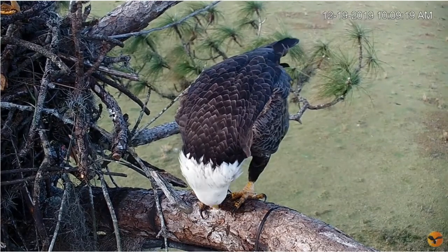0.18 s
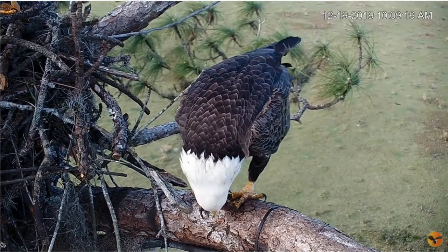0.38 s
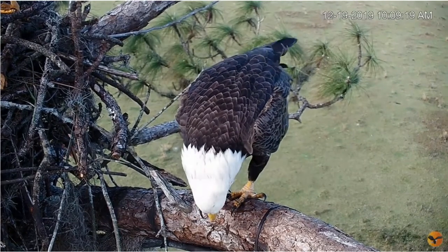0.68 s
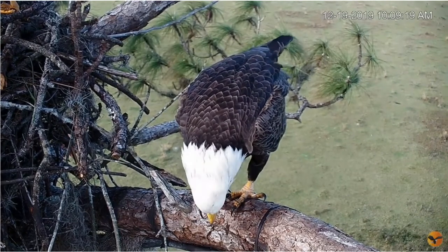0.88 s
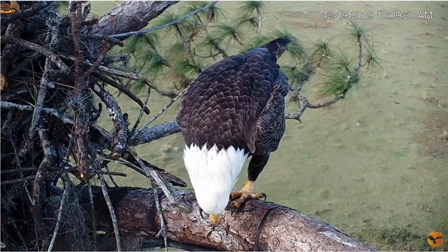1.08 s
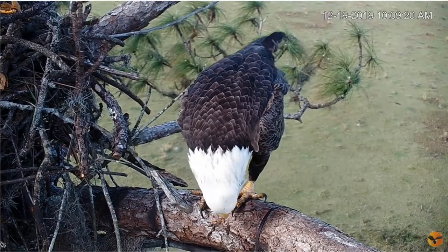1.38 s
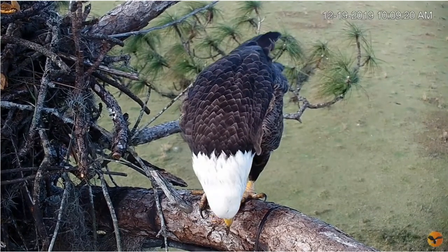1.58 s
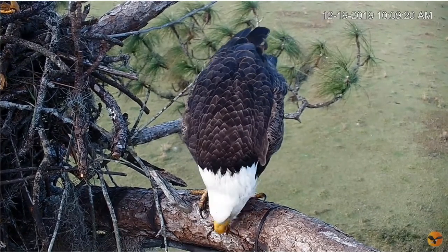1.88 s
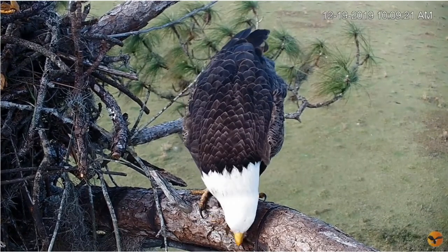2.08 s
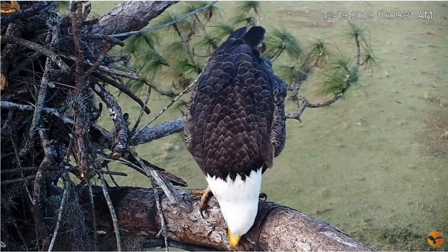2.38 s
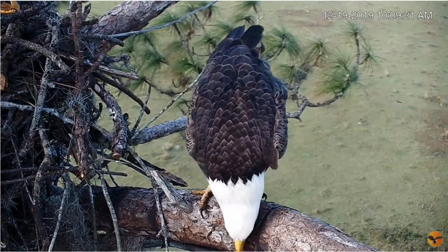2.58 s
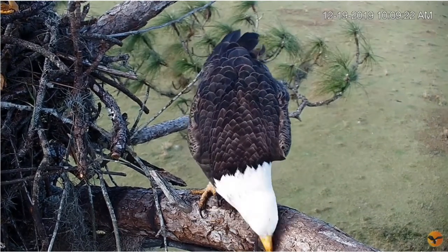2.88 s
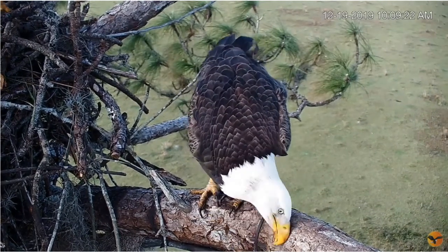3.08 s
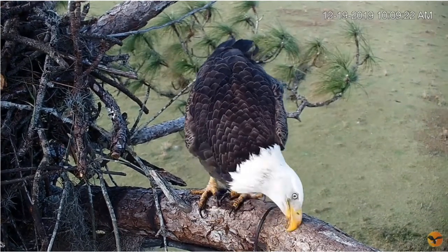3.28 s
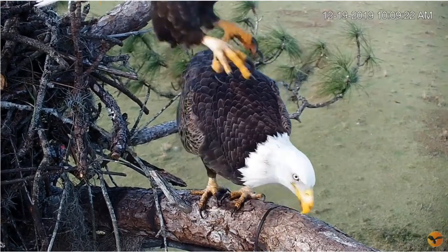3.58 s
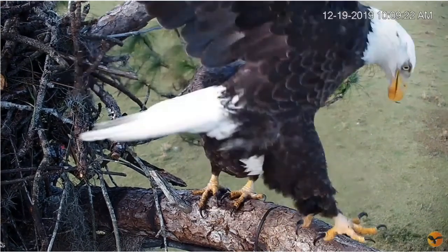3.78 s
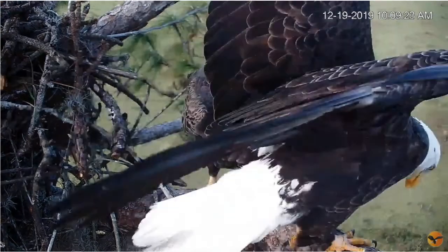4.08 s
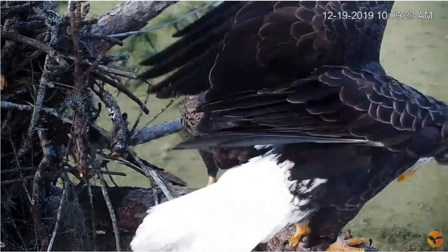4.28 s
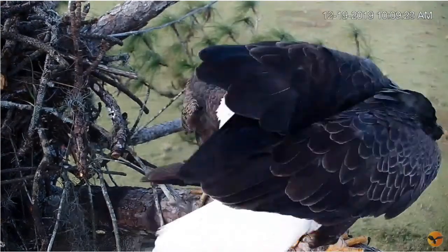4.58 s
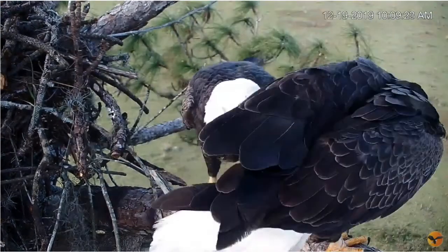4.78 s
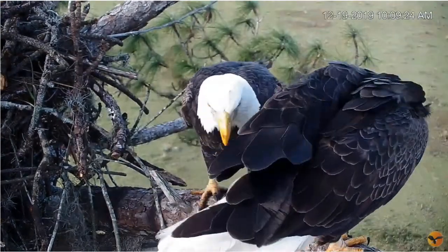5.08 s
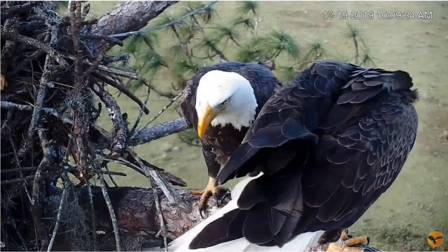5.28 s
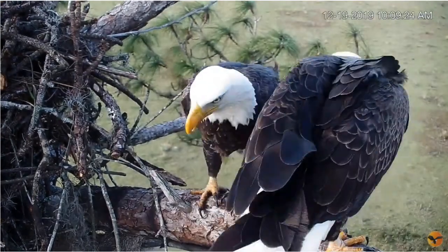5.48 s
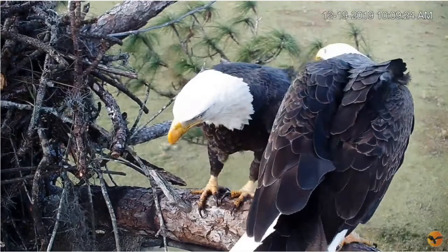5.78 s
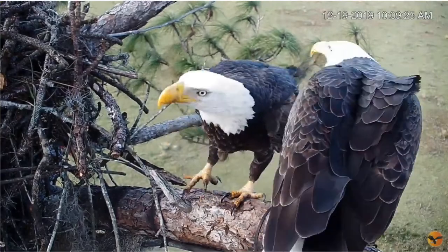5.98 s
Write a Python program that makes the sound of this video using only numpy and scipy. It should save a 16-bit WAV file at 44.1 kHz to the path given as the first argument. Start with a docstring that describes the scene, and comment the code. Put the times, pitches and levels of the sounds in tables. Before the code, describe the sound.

Over a low outdoor rumble and the roar of distant traffic, a brief soft scrape on bark leads into high, quavering eagle cries and short, sharp whistles. The birds are close, and the loudest cry, about halfway through, overloads the microphone a little. Faint talon ticks and quick, quieter chittering notes follow, then a final thin cry. A short reverberation surrounds the calls.

```python
"""Two bald eagles greet each other on a branch beside their nest, close to a small outdoor microphone.
A foot scrapes on bark over a low rumble and the roar of far-off traffic. From about one second the syrinx
gives thin wavering peals and piercing chirps, the loudest overloading the microphone; talons tick.
Near five seconds the calls give way to low chittering as the mate lands, with one last peal near the end.
A short reverberation spreads it all into stereo."""
import sys
import numpy as np
from scipy import signal
from scipy.fft import rfft, irfft
from scipy.io import wavfile

SR = 44100
rng = np.random.default_rng(int(sys.argv[2]) if len(sys.argv) > 2 else 0)


def log_audio(samples):
    """Write samples as a 16-bit WAV file to the path given in sys.argv[1]."""
    # one column per channel
    frames = np.atleast_2d(samples).T
    # limit to full scale, then quantise
    limited = np.clip(frames, -1, 1)
    pcm = np.round(limited * 32767).astype(np.int16)
    wavfile.write(sys.argv[1], SR, pcm)


N = 272097

# colour of the hiss in the open beak: frequency_hz, level_db
BEAK_HISS = [(1500, -31.5), (2700, 4), (3900, -1), (5200, -17), (7500, -8.5), (11000, -39)]


def peals(settle_s=.013, lead_s=.002, dip_sharpness=5.1, wobble_db=.33, rasp_hz=2896):
    """Held tones at close range: each starts hoarse and wavers through two crests, louder where higher."""
    # one peal a row: start_s, length_s, attack_s, release_s, pitch_hz, climb_hz_per_s, waver_hz,
    # waver_share, level_db, dip_db, swell_db_per_s, second_harmonic_db, rasp_db
    calls = [ (0.896, 0.16, 0.037, 0.023, 3630, -100, 10.2, 0.0185, -16.5, 11, -53, -25, -17.5),
             (2.323, 0.1544, 0.013, 0.017, 3652, 400, 11.9, 0.016, -19.5, 5.5, 18, -24.5, -28.5),
             (3.058, .164, 0.019, .013, 2800, 326.5, 10.9, .026, -7, 2, 8.5, -29, -42.5),
             (5.872, 0.1677, 0.015, 0.017, 3484, -120, 10.4, 0.0292, -14.7, 15.5, -40.5, -29, -32)]
    out = np.zeros(N)
    for (start, length, attack, release, hz, climb, waver_hz,
         depth, db, dip_db, swell, second_db, rasp_db) in calls:
        t = np.arange(0, length, 1 / SR)
        n = len(t)
        hoarse = np.exp(-t / settle_s)
        pitch = hz * (1 - depth * np.cos(2 * np.pi * waver_hz * t)) + climb * (t - length / 2)
        # loudness crests just before pitch does
        trough = abs(np.cos(np.pi * waver_hz * (t + lead_s))) ** dip_sharpness
        level = amp(db + swell * t - dip_db * trough + wobble_db * tremor(n, hz=55))
        tone = syrinx(pitch, [0, second_db, -60], .0016 + .0043 * hoarse, shimmer=.011, flutter_hz=295.6)
        hiss = (amp(-47.5) + amp(-25) * hoarse) * noise(n, lambda f: read(BEAK_HISS, f))
        rasp = amp(rasp_db) * breath_rasp(n, rasp_hz)
        add(out, start, gate(t, attack, release) * level * (tone + hiss + rasp))
    return out


def chirps(swell_db=3.5, hiss_db=-33):
    """Short piercing whistles near the microphone, each one quick slide of the syrinx."""
    # one chirp a row: start_s, length_s, pitch_hz, rise_hz, level_db
    notes = [ (0.924, 0.011, 2813, 53, -19.5), (1.525, 0.064, 2730, 281, -23.5),
             (1.568, 0.052, 2890, -83, -29.5), (1.599, 0.052, 2818, 179, -7.5),
             (2.328, 0.021, 2853, 44.5, -25.5), (3.557, 0.034, 2890, 156.5, -24),
             (3.577, 0.026, 2941, 18, -8.5), (3.685, 0.017, 2693, -180, -12.5),
             (3.698, 0.018, 2822, 28, -8.5), (4.227, 0.017, 2870, 77, -33), (5.356, .019, 3364, 6, -35)]
    out = np.zeros(N)
    for start, length, hz, rise_hz, db in notes:
        t = np.arange(0, length, 1 / SR)
        pitch = glide(len(t), hz, rise_hz, droop=.0064)
        tone = syrinx(pitch, [0, -36, -54], jitter=.0042, shimmer=.035, flutter_hz=304)
        hiss = amp(hiss_db) * noise(len(t), lambda f: read(BEAK_HISS, f))
        level = amp(db + swell_db * (t / length - .5))
        add(out, start, gate(t, .37 * length, .61 * length) * level * (tone + hiss))
    return out


def chitter(rasp_db=-20):
    """Quick, low, reedy notes, each a small arch of pitch through the throat."""
    # one note a row: start_s, length_s, pitch_hz, rise_hz, level_db
    notes = [ (4.695, .017, 1735, -150, -35), (4.707, 0.03, 1282, -134, -33.5),
             (5.115, 0.034, 1926, -16, -27.5), (5.132, 0.022, 1967, -3, -26), (5.149, .02, 1930, -99, -28),
             (5.237, 0.017, 1880, -73.5, -30.5), (5.252, .016, 1888, -124, -30.5),
             (5.686, 0.031, 1285, 92, -35.5), (5.783, 0.0078, 1260, -320, -38.5),
             (5.799, .017, 1913, -124, -30), (5.815, .017, 1968, -34.5, -28.5), (6, .017, 1905, -87.5, -31),
             (6.01, 0.031, 1370, -240, -39), (6.122, 0.012, 1203, -330, -37)]
    # colour of the throat: frequency_hz, gain_db
    throat = [(1200, 14), (1900, 7), (2600, 9.5), (3400, 6), (3900, 6.5), (5000, -18), (5800, -15.5),
              (7700, -27), (10000, -54)]
    out = np.zeros(N)
    for start, length, hz, rise_hz, db in notes:
        n = round(length * SR)
        pitch = glide(n, hz, rise_hz, droop=.043)
        harmonic_db = [read(throat, k * pitch) for k in range(1, 6)]
        tone = syrinx(pitch, harmonic_db, jitter=.013, shimmer=.02, flutter_hz=530)
        rasp = noise(n, lambda f: read(throat, f) - 12 * abs(np.log2((f + 1) / 3200)))
        envelope = gate(np.arange(n) / SR, .24 * length, .34 * length)
        add(out, start, amp(db) * envelope * (tone + amp(rasp_db) * rasp))
    return out


def cracks():
    """The voice cracks: the syrinx slips for a moment to another, unsteady pitch."""
    # one rough squeak a row: start_s, length_s, pitch_hz, level_db
    squeaks = [(0.967, 0.041, 2950, -38), (1.007, 0.027, 2900, -38), (1.576, 0.042, 4050, -42.5),
               (1.706, 0.02, 4090, -47), (2.298, 0.013, 2114, -44.5), (3.056, 0.011, 3490, -38),
               (3.157, 0.012, 3107, -29.5), (3.552, 0.032, 3690, -45), (3.68, .011, 3500, -41),
               (4.209, 0.029, 3450, -48)]
    out = np.zeros(N)
    for start, length, hz, db in squeaks:
        n = round(length * SR)
        tone = syrinx(np.full(n, hz), [0, -32], jitter=.021, shimmer=.27, flutter_hz=450)
        add(out, start, amp(db) * tone * signal.windows.hann(n))
    return out


def syrinx(pitch, harmonic_db, jitter, shimmer, flutter_hz):
    """A vibrating membrane, unsteady in pitch (jitter) and in level (shimmer), both as shares."""
    n = len(pitch)
    phase = 2 * np.pi * np.cumsum(pitch * (1 + jitter * tremor(n, flutter_hz))) / SR
    tone = sum(amp(db) * np.cos(k * phase) for k, db in enumerate(harmonic_db, 1))
    return unit(tone) * (1 + shimmer * tremor(n, flutter_hz))


def breath_rasp(n, hz, width_hz=180):
    """Breath noise ringing in a narrow microphone-housing resonance near 2.9 kHz."""
    return noise(n, lambda f: -20 * np.log10(1 + ((f - hz) / width_hz) ** 2))


def talons(decay_s=.002, grain_db=4):
    """Dry ticks and one grainy scrape on the bark of the branch."""
    # talons and beak ticking on bark: start_s, level_db, tilt_db_per_octave
    ticks = [(1.072, -50, 16), (3.521, -45, 25), (3.525, -49, 14), (4.283, -48, 26), (4.287, -44, 22),
             (4.412, -57, -2), (4.774, -43.5, 9)]
    # a foot scraping over bark: time_s, level_db
    scrape = [(.15, -63), (.18, -49), (.21, -47), (.27, -55.5), (.305, -43), (.34, -63), (.45, -76)]
    # colour of bark under a talon: frequency_hz, level_db
    bark = [(1000, -29), (2400, 2.5), (2850, 13), (3300, 7), (4200, 6), (5200, -21.5), (7500, -14.5),
            (13000, -47)]
    out, t = np.zeros(N), np.arange(1024) / SR
    for start, db, tilt in ticks:
        burst = noise(len(t), lambda f: read(bark, f) + tilt * np.log2(np.maximum(f, 2000)))
        add(out, start, amp(db) * burst * np.exp(-t / decay_s))
    scrape_db = np.interp(np.arange(N) / SR, *np.transpose(scrape), left=-120, right=-120)
    friction = noise(N, lambda f: read(bark, f))
    grain = unit(amp(grain_db * tremor(N, hz=120)))
    return out + amp(scrape_db) * friction * grain


def outdoors(waver_db=.62):
    """The background at the nest: a low rumble and the roar of distant traffic and air."""
    # colours of the rumble and the roar: frequency_hz, level_db
    rumble_colour = [(15, -38), (26, -1), (43, 3.5), (61, 1.5), (84, -5), (199, -27.5), (300, -38.5),
                     (390, -69), (660, -120)]
    roar_colour = [(150, -45.5), (250, -20), (575, -14), (636, -12), (693, -10), (957, -2), (1300, -16),
                   (1620, -21.5), (2520, -26.5), (2890, -22), (3140, -23.5), (3990, -26.5), (5410, -44),
                   (13300, -53), (14500, -64.5)]
    # narrow humps in the roar: centre_hz, width_hz, gain_db
    humps = [(910, 110, 1.5), (2872, 160, 6)]
    # rise and fall of the rumble and the roar: time_s, level_db
    rumble_level = [(0, -32.5), (.85, -33.5), (1.25, -29.5), (1.75, -30.5), (2.4, -39), (2.9, -39.5),
                    (3.15, -37), (3.75, -32), (3.93, -39), (4.14, -33), (5.5, -34.5), (6.17, -28.5)]
    roar_level = [(0, -42), (1.65, -41), (2.9, -44.5), (3.9, -43.5), (4.25, -41.5), (5.5, -42.5),
                  (6.17, -40)]
    t = np.arange(N) / SR
    rumble = noise(N, lambda f: read(rumble_colour, f) - 24 * np.log2(np.maximum(f / 300, 1)))
    roar = noise(N, lambda f: read(roar_colour, f)
                 + sum(db / (1 + (2 * (f - hz) / width) ** 2) for hz, width, db in humps))
    rumble_db = np.interp(t, *np.transpose(rumble_level))
    roar_db = np.interp(t, *np.transpose(roar_level)) + waver_db * tremor(N, hz=10)
    return rumble * amp(rumble_db) + roar * amp(roar_db)


def overload(x, ceiling=.365, bias=.055, crossover_hz=1400):
    """The loudest calls hit the microphone's ceiling, one side sooner; low sounds pass untouched."""
    # colour of the distortion: frequency_hz, gain_db
    buzz = [(900, -33), (1700, -6), (2500, 2), (3200, 0.5), (5600, -10.5), (8500, 1.5), (11300, 1.5),
            (14000, -1)]
    hz = np.fft.rfftfreq(N, 1 / SR)
    highpass = 1 - 1 / (1 + (hz / crossover_hz) ** 6)
    oversampled = signal.resample_poly(irfft(rfft(x) * highpass, N), 4, 1)
    clipped = np.clip(oversampled, bias - ceiling, bias + ceiling)
    distortion = signal.resample_poly(clipped - oversampled, 1, 4)
    return x + irfft(rfft(distortion) * amp(read(buzz, hz)), N)


def reverberation(x, wet_db=-18, treble_loss_db_per_s=115):
    """Dense scattered echoes, unrelated in the middle and at the sides; the treble dies first."""
    # relative strength of the echoes: delay_s, level_db
    decay = [(.008, -23.5), (.017, -0.5), (.026, 4), (.042, -2.5), (.056, -6.5), (.078, 0), (.12, -14.5),
             (.2, -29), (.4, -50)]
    # colour of the echoes: frequency_hz, gain_db
    echo_colour = [(80, -40.5), (160, -23.5), (300, -7.5), (600, 0.5), (1200, -0.5), (3000, -1.5),
                   (8500, 5), (13000, -12)]
    t, padded = np.arange(SR // 2) / SR, N + SR
    envelope = amp(np.interp(t, *np.transpose(decay), left=-100, right=-100))
    echoes = rng.standard_normal((2, len(t))) * envelope
    echoes *= amp(wet_db) / np.linalg.norm(echoes, axis=1, keepdims=True)
    low = signal.sosfiltfilt(signal.butter(3, 5500, fs=SR, output="sos"), echoes)
    echoes = low + (echoes - low) * amp(-treble_loss_db_per_s * t)
    colour = amp(read(echo_colour, np.fft.rfftfreq(padded, 1 / SR)))
    mid, side = irfft(rfft(echoes, padded) * rfft(x, padded) * colour, padded)[:, :N]
    return np.array([x + mid + side, x + mid - side])


def glide(n, hz, rise_hz, droop):
    """The pitch of a short note: a slide whose ends sag by the share droop."""
    position = np.linspace(-1, 1, n)
    return hz * (1 - droop * position ** 2) + rise_hz * position / 2


def gate(t, attack_s, release_s):
    """A smooth attack, a hold and a smooth release."""
    ramp = np.minimum(t / attack_s, (t[-1] - t) / release_s)
    return np.sin(np.pi / 2 * np.clip(ramp, 0, 1)) ** 2


def tremor(n, hz):
    """Random unsteadiness up to a rate."""
    return noise(n + 4096, lambda f: -10 * np.log10(1 + (f / hz) ** 4))[:n]


def noise(n, colour_db):
    """Noise of rms 1 whose spectrum in dB is a function of frequency."""
    gain = amp(colour_db(np.fft.rfftfreq(n, 1 / SR)))
    return unit(irfft(rfft(rng.standard_normal(n)) * gain, n))


def read(points, hz):
    """Interpolates a colour table on a log-frequency axis."""
    f, db = np.transpose(points)
    return np.interp(np.log(hz + 1), np.log(f + 1), db)


def add(mix, start_s, sound):
    """Lays a sound into the mix at a time."""
    part = mix[max(round(start_s * SR), 0):][:len(sound)]
    part += sound[:len(part)]


def amp(db):
    """Decibels to gain."""
    return 10 ** (np.asarray(db) / 20)


def unit(x):
    """Scales to rms 1."""
    return x / np.sqrt(np.mean(x ** 2) + 1e-20)


def scene():
    """Both birds and their background, heard from one point close to the branch."""
    return np.tile(outdoors() + peals() + chirps() + cracks() + chitter() + talons(), (2, 1))


def record(dry):
    """The small microphone overloads; stereo reverberation follows, then a 14 kHz band limit."""
    microphone = overload(dry.mean(axis=0))
    wide = reverberation(microphone) * signal.windows.tukey(N, .001)
    lowpass = signal.firwin(401, 14000, window=("kaiser", 9), fs=SR)
    return signal.oaconvolve(wide, lowpass[None], "same", axes=1)


dry = scene()
out = record(dry)
log_audio(out)
```